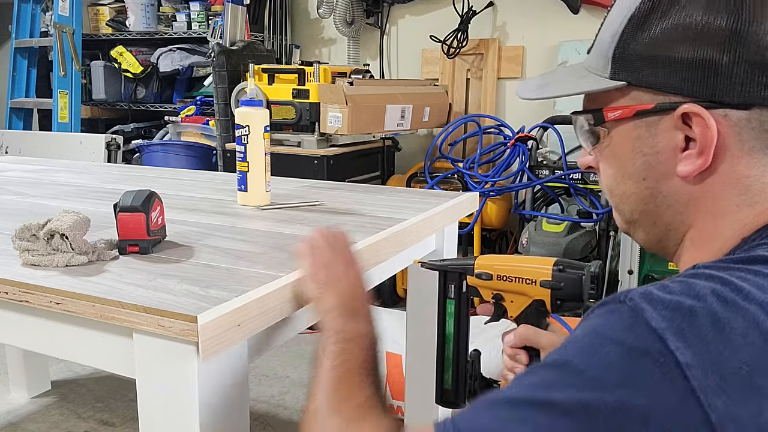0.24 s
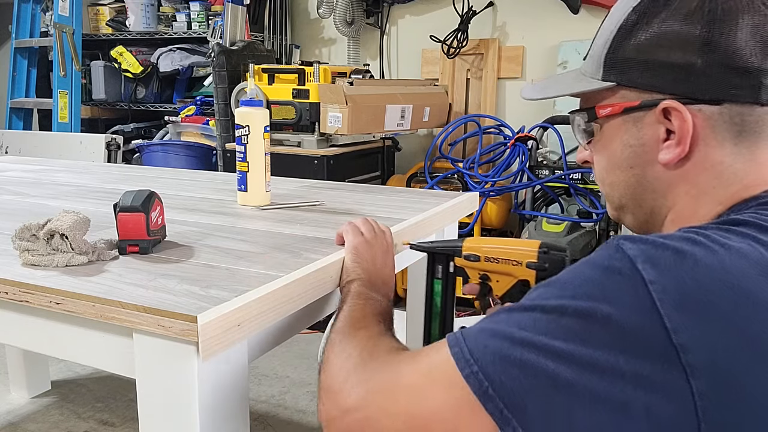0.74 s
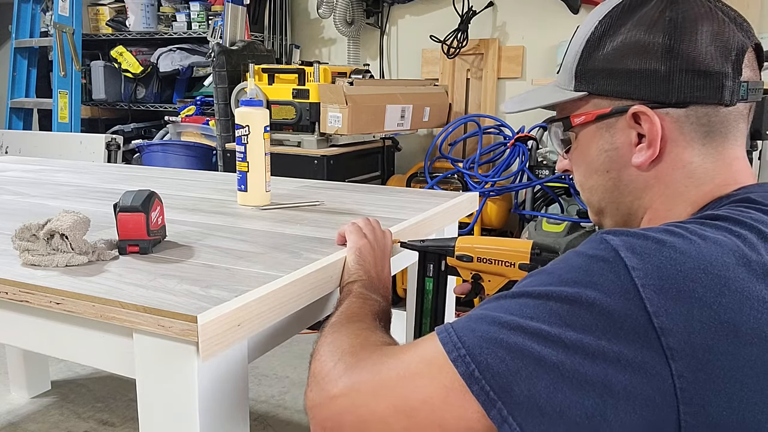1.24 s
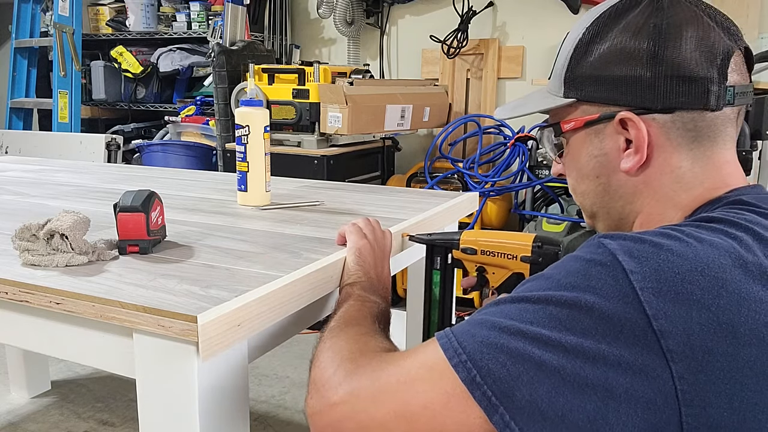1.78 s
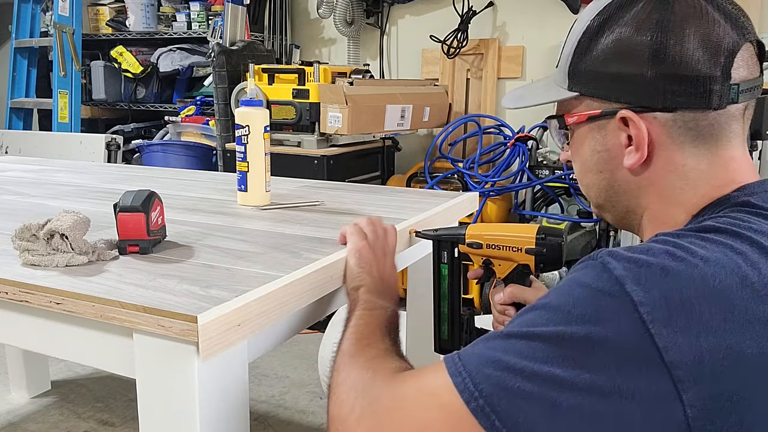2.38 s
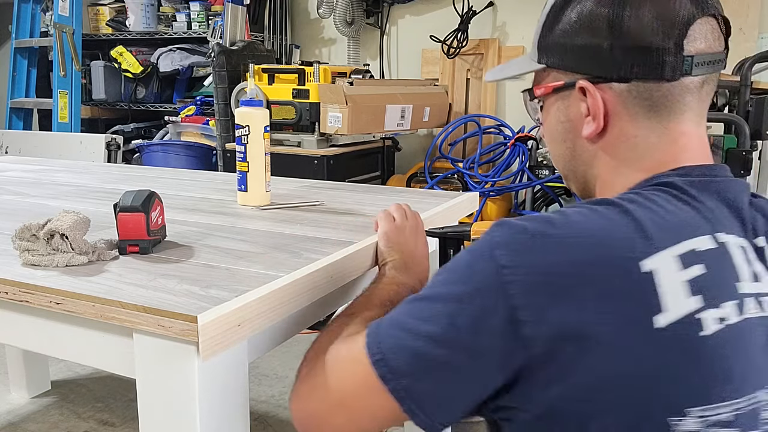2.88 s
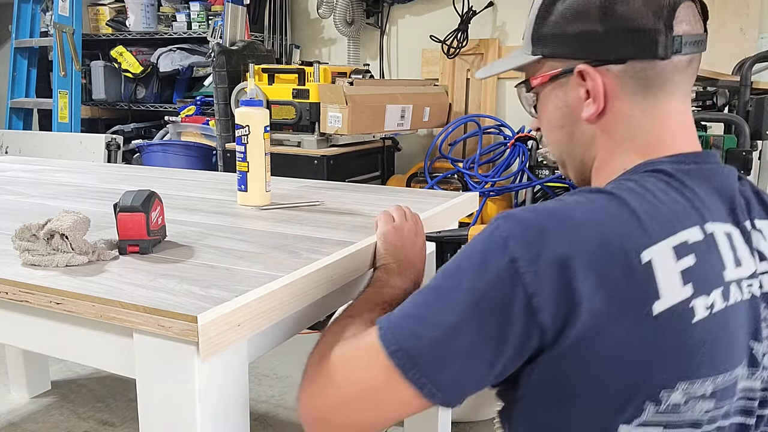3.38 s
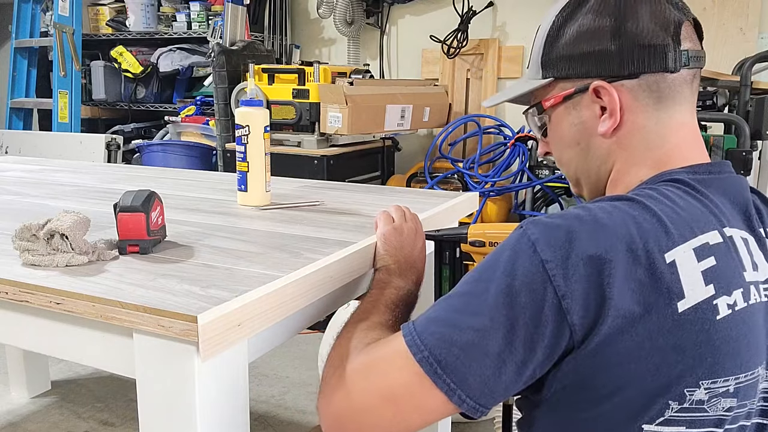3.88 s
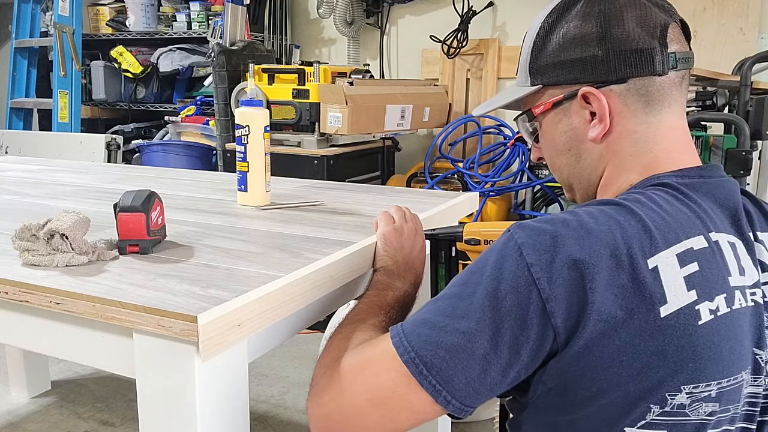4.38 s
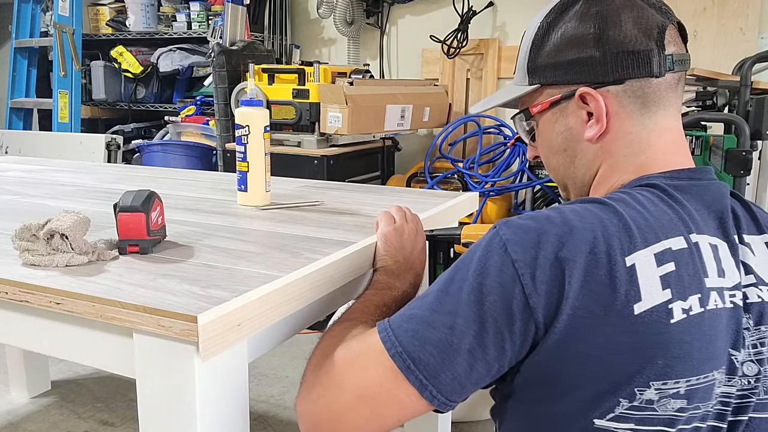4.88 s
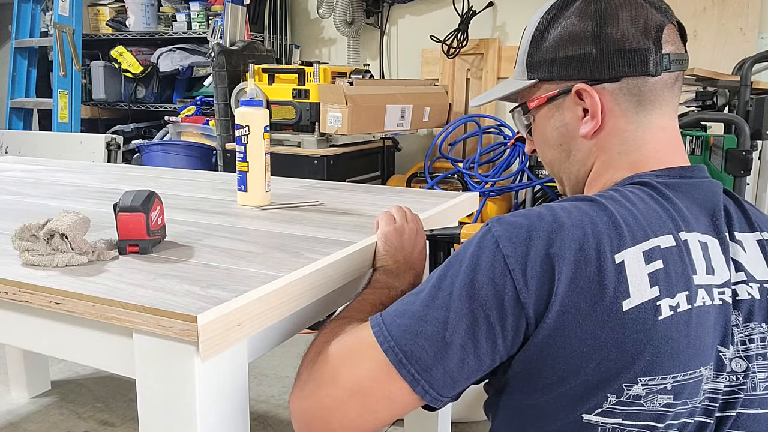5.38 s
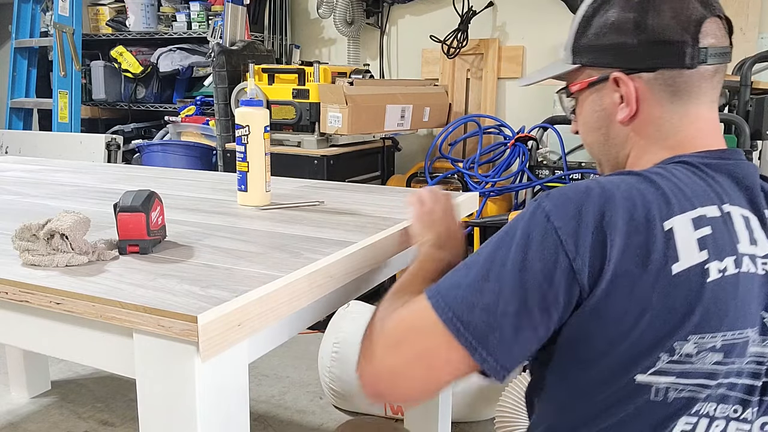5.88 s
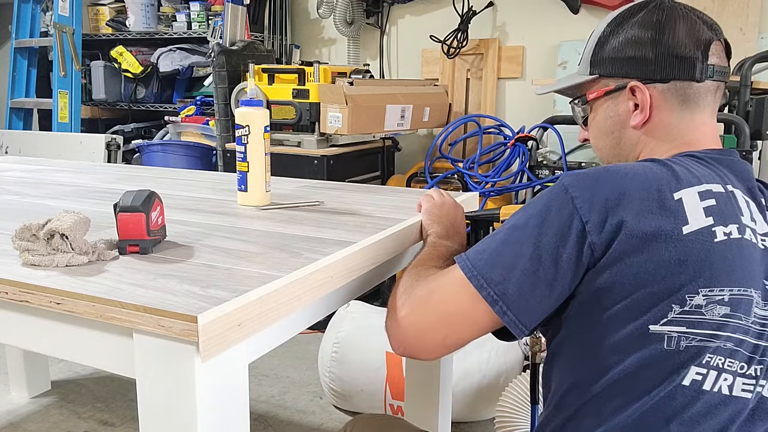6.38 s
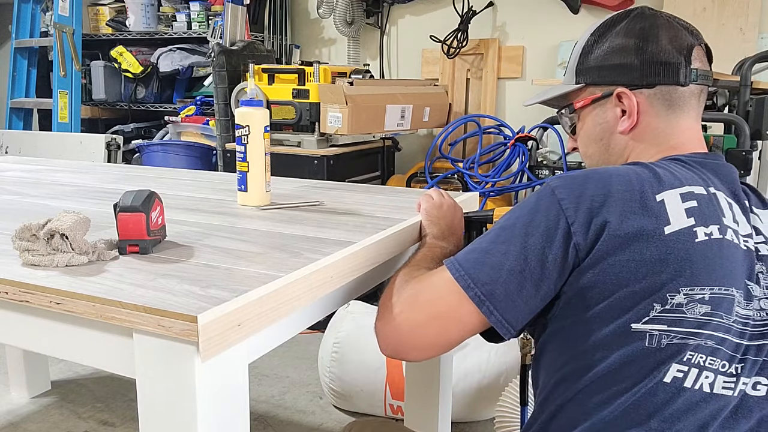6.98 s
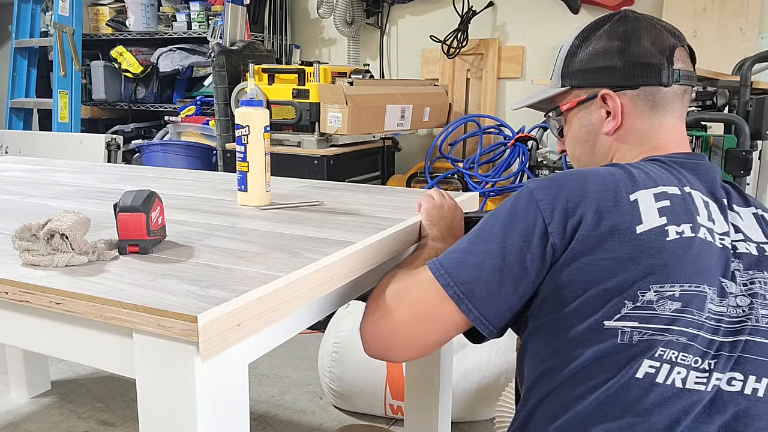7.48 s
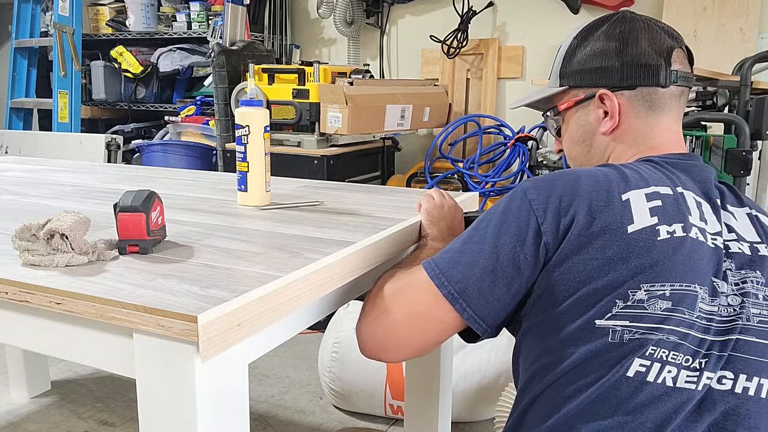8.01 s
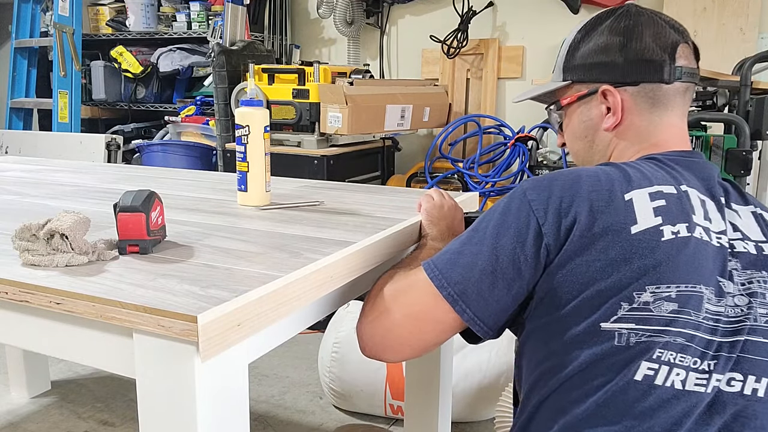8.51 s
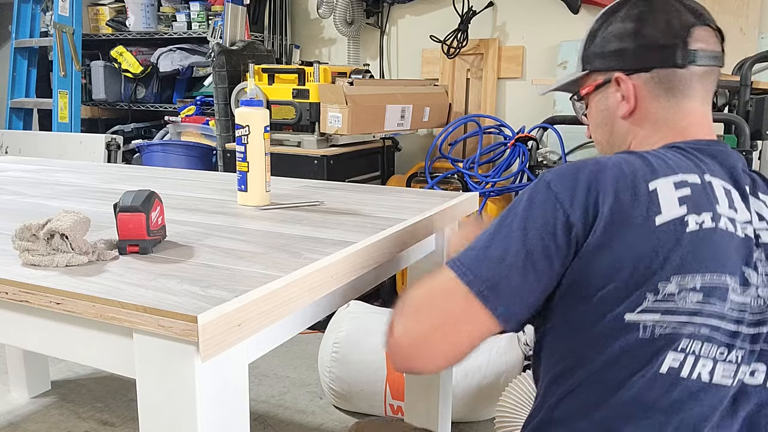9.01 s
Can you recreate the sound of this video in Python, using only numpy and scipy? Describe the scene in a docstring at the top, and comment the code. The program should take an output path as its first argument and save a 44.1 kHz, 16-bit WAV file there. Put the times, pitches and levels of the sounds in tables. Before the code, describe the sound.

A low, slightly throbbing motor hum with faint hiss runs throughout in a small workshop, rising gently over the first two seconds. From about 1 to 4 seconds a pneumatic stapler touches wooden trim with scattered light, high metal clicks. Cloth and hose slide softly at 2 seconds, and a dull bump comes at 2.7. At 5.4 seconds the stapler fires: a loud, sharp crack with a woody knock from the table, followed instantly by a tiny ping, a short gust of exhaust air and a quick metal rattle, with brief room reverberation. The hum dips after the shot and creeps back over the next two seconds. Soft bumps and a few clicks between 6.2 and 6.9 seconds mark the tool being repositioned. A second, similar shot comes at 8.6 seconds, the background dips again, and one last bump on the table follows at 9.1.

```python
"""A machine hums in a workshop while a pneumatic stapler is lined up on trim on a wooden table:
light clicks, dull bumps, a slide of cloth and hose. At 5.4 s it fires: a valve puff, the driver's
double blow, then the valve's ping, a gust of exhaust and the piston rattling home. The tool clicks
into a new place, drives a second staple at 8.6 s and bumps the table once more.
The camera's gain ducks at each shot and creeps back after a hold."""
import sys
import numpy as np
from scipy import signal
from scipy.fft import rfft, irfft, next_fast_len
from scipy.io import wavfile
from scipy.ndimage import uniform_filter1d, minimum_filter1d, map_coordinates

SR = 44100
rng = np.random.default_rng(int(sys.argv[2]) if len(sys.argv) > 2 else 0)


def store_wav(level_fs):
    """Save 16-bit WAV to argv[1]."""
    pcm = np.round(np.clip(np.atleast_2d(level_fs), -1, 1) * 32767)
    wavfile.write(sys.argv[1], SR, pcm.T.astype(np.int16))


N = 407925
TIME = np.arange(N) / SR
AGE = TIME[:SR // 2]  # time since the start of one event

# one cue per staple: (first driver blow [s], puff [dB], wood [dB], table ring [dB], trigger release [s],
# valve ping [dB], exhaust [dB], rattle [dB], rattle time stretch [ratio])
SHOTS = [(5.4411, -9.5, 1.4, -31.5, 5.5625, 13, -5, -1.5, .97),
         (8.5893, -14.5, -1.2, -26, 8.7292, 10.5, -3, 3.5, 1.03)]
# the driver hits the staple, then bottoms out:
# (time after first blow [s], crack [dB], wood [dB], punch [dB])
BLOWS = [(0, 5.5, -0.5, -8), (.0111, 2, 0.8, -13)]
# two surges of exhaust: (time after release [s], level [dB], length [s], tail [s])
SURGES = [(.0053, 0.4, .0085, .004), (.022, -.5, .027, .026)]
# piston and trigger reset: (time after release before stretching [s], clack [dB], thump [dB])
RATTLE = [(.008, 2.5, -11), (.0195, 2, -8.5), (.045, 2.5, -2.5), (.1143, -5, -38)]
# nose and safety catch touch the work:
# (time [s], level [dB], body relative to level [dB], pitch [ratio], lead of a graze or 0 for none [s])
TOUCHES = [(0.972, -39, 1.5, .7, 0), (1.1099, -36, -9, 0.95, 0), (1.3503, -19, -8, 0.99, .017),
           (1.392, -29, 1.5, 1.08, 0.0038), (1.4328, -25, -22, 1.01, 0), (2.1311, -21.5, -10, 1.1, 0),
           (2.279, -28, -10, 1.07, 0), (2.4473, -28.5, -10.5, .98, 0.0068), (2.5803, -26.5, -10, 1, 0.0036),
           (2.7828, -24, -9, 1, .008), (3.4284, -33, -3.5, 1.09, 0), (3.473, -25.5, -11, 0.94, 0.0042),
           (4.007, -23, -27.5, .98, .018), (4.1455, -37, -15, 1, .018), (6.627, -19, -10, 0.98, 0.017),
           (6.8473, -17.5, -27, 0.97, 0.0011), (6.8773, -28, -22, .98, 0), (6.8884, -29.5, -20, 0.98, 0),
           (8.1518, -34.5, -3.5, 0.935, 0)]
# soft bumps against the table: (time [s], tick [dB], thump [dB])
BUMPS = [(.202, -55, -31), (2.712, -18.5, -23), (6.225, -48, -30), (6.549, -20.5, -27.5),
         (9.122, -19, -26.5)]
# cloth and hose slide as the tool moves: (start [s], hold [s], level [dB])
SLIDES = [(2.02, 0.2, -43), (2.66, .02, -59)]
# the worker shifts along the table: (time [s])
MOVES_S = [3.2, 5.9]
# the hum's colour at each place: (harmonic [number], first place [dB], second [dB], third [dB])
MOTOR_HARMONICS = [(1, -65, -61, -62), (2, -49, -50.5, -51.5), (4, -53, -48.5, -47), (5, -54.5, -54, -57),
                   (6, -49, -57.5, -49), (8, -50, -45.5, -51)]
# resonances shaken by the pump: (frequency [Hz], width [Hz], level [dB])
HOUSING_MODES = [(74, 3.5, -45.5), (109.8, 3.4, -40), (251, 36, -61.5), (323.4, 32, -60)]

# ringing parts: (frequency [Hz], level [dB], t60 [s])
TABLE_MODES = [(302, -6, 0.4), (348, -4, 0.44), (394, -5, .4)]  # the table top's long, low ring
PUNCH_MODES = [(165, -5.5, .03), (403, 0, .02)]  # its short knock
VALVE_MODES = [(2395, -7, 0.014), (2710, 0.5, 0.0092), (6900, -8, 0.0066), (8400, -11.5, 0.0087)]  # the valve's ping
CATCH_MODES = [(6800, -17, 0.0069), (7790, -3, 0.017), (7920, -0.5, 0.012), (8500, -11, 0.0092),
               (9800, -32, 0.0068)]  # the safety catch's high tink
BODY_MODES = [(2770, -10, 0.0069), (3610, 1, 0.017), (4460, -4, 0.017), (5570, -3, 0.02)]  # the tool's shell

# noise colours: (frequency [Hz], spectral level [dB])
CRACK_EQ = [(60, -11.5), (200, -6.5), (380, 2), (800, 2), (1300, 7), (2600, -10.5), (4500, -9), (6500, -7),
            (8700, 1), (11000, -6.5), (16000, -14.5)]  # a hard steel strike
WOOD_EQ = [(50, -15), (120, -16.5), (200, -15), (310, -4), (700, 0.5), (1400, 1.5), (2500, -5.5),
           (4200, -14.5), (5700, -16.5), (6700, -13.5), (8600, -15), (11500, -13), (16000, -29.5)]  # the wood's dense modes
EXHAUST_EQ = [(60, -18), (200, -15.5), (400, -8), (1500, -5.5), (2250, -2.5), (2660, 1.5), (3100, -7.5),
              (4500, -10), (5700, -12.5), (6600, -5), (8700, 2.5), (10000, -3.5), (12000, 0),
              (16000, -15.5)]  # air jetting from the cap
THUMP_EQ = [(25, -12.5), (60, 1.5), (190, -9.5), (400, -3.5), (900, -7.5), (2000, -18), (5000, -37.5),
            (16000, -59.5)]  # a thud on the table
RASP_EQ = [(300, -24), (1500, 2), (2400, 5.5), (3000, -1), (3700, 1), (6500, -7), (8500, -5), (11000, -8),
           (15000, -25)]  # cloth rubbing firmly
MACHINE_AIR_EQ = [(20, -34), (40, -14), (65, 2.5), (120, 0.5), (195, -6), (300, .5), (450, -4), (900, -5.5),
                  (1600, -13), (2500, -20.5), (4000, -29.5), (8000, -36.5), (12000, -29), (16000, -32.5)]  # the machine's airy rumble
PUFF_EQ = [(5500, -33), (8300, -3), (12000, -3), (16000, -10.5)]
CLACK_EQ = [(500, -16), (2600, 2), (5000, -11.5), (8400, .5), (11000, -6), (16000, -19.5)]
BODY_EQ = [(1000, 5), (5000, 4), (9000, -5), (15000, -13)]
BUMP_TICK_EQ = [(500, -1), (4000, -2), (8000, -9.5), (13000, 4.5), (16000, -4)]
BRUSH_EQ = [(2000, -9), (6000, -5.5), (9000, -1), (11800, 1), (15000, -14)]
HISS_EQ = [(2000, -9), (5000, -2.5), (6900, -10.5), (7900, -1.5), (9500, -3), (11500, 1.5), (16000, -1)]
WHISTLE_EQ = [(11550, -60), (12020, 0), (12500, -60)]

# the workshop's reverb: (frequency [Hz], t60 [s])
ROOM_DECAY = [(60, 0.16), (300, 0.34), (1200, 0.41), (2700, 0.47), (8000, 0.38), (15000, 0.33)]
# the microphone's comb of notches: (frequency [Hz], depth [0-1])
NOTCH_DEPTH = [(600, 0), (950, .6), (1100, 1), (2000, .8), (3000, .9), (7200, 0.8), (8000, 0.8),
               (10200, .65), (11500, 0.2), (13000, 0.04)]
# more feedback makes them narrower: (frequency [Hz], feedback [0-1])
NOTCH_FEEDBACK = [(1000, .83), (3000, .3), (7000, .3), (10000, .55)]

MOTOR_HZ, PUMP_HZ = 59.72, 8.37


def driver(puff_lead_s=.0058):
    """Air puffs into the cylinder; the driver cracks on the staple and sets the table top ringing."""
    hits, table = np.zeros((2, N))
    for strike, puff_db, shot_wood_db, table_db, *_ in SHOTS:
        add(hits, strike - puff_lead_s, amp(puff_db) * fade(t60=.024, attack=.0013) * noise(PUFF_EQ))
        for delay, crack_db, wood_db, punch_db in BLOWS:
            at = strike + delay
            add(table, at, amp(punch_db) * ring(PUNCH_MODES, scatter_db=1.5))
            add(hits, at, amp(crack_db) * fade(t60=.014, attack=.0008) * noise(CRACK_EQ))
            wood = fade(t60=.25, attack=.012) * noise(WOOD_EQ)
            add(hits, at, amp(shot_wood_db + wood_db - 11.5) * wood)
            add(table, at, amp(table_db) * ring(TABLE_MODES, scatter_db=3))
    return table + room(hits, wet_db=-4, build_s=.018)


def exhaust():
    """The valve snaps back with a ping, then the cylinder vents through the cap in two surges."""
    valve, air = np.zeros((2, N))
    for *_, release, ping_db, air_db, _, _ in SHOTS:
        ping = ring(VALVE_MODES, scatter_db=4.5)
        snap = .35 * fade(t60=.0065, attack=.0002) * noise(CRACK_EQ)
        add(valve, release, amp(ping_db) * (ping + snap))
        for delay, surge_db, length, tail in SURGES:
            flow = (1 - np.exp(-AGE / .003)) * np.exp(-np.maximum(AGE - length, 0) / tail)
            shove = amp(-22) * push(period_s=.0162) + amp(-20) * push(period_s=.0075)
            add(air, release + delay, amp(air_db + surge_db) * (flow * noise(EXHAUST_EQ) + shove))
    sputter = amp(1.9 * wobble(200))  # the piston moves past the ports
    return room(valve, wet_db=-17, build_s=.01) + room(air * sputter, wet_db=-5.5, build_s=.021)


def piston():
    """Steel clacks inside the tool, and its recoil thumps the table."""
    out = np.zeros(N)
    for *_, release, _, _, rattle_db, stretch in SHOTS:
        for delay, clack_db, thump_db in RATTLE:
            at = release + stretch * delay
            add(out, at, amp(rattle_db + clack_db) * fade(t60=.022, attack=.0012) * noise(CLACK_EQ))
            add(out, at, amp(thump_db) * fade(t60=.04, attack=.00149) * noise(THUMP_EQ))
    return room(out, wet_db=-11.5, build_s=.01)


def handling():
    """Light metal clicks and dull bumps while the tool is lined up."""
    out = np.zeros(N)
    for at, db, body_db, pitch, lead in TOUCHES:
        add(out, at, amp(db) * click(body_db, pitch))
        if lead > 0:  # a weaker, duller graze comes first
            add(out, at - lead, amp(db - 12.5) * click(body_db + 3, pitch))
    for at, tick_db, thump_db in BUMPS:
        add(out, at, amp(tick_db) * fade(t60=.0041, attack=.0002) * noise(BUMP_TICK_EQ))
        thud = fade(t60=.051, attack=.00099) * noise(THUMP_EQ)
        add(out, at, amp(thump_db) * (thud + .59 * push(period_s=.016)))
    return room(out, wet_db=-18, build_s=.01)


def click(body_db, pitch):
    """One metal contact: a tick, the catch's high ring and the tool's lower body ring, mixed per touch."""
    contact = fade(t60=.015, attack=.0004)
    tick_eq = [(3000, -22), (5800 * pitch, -15), (8200 * pitch, 0), (11000 * pitch, -12), (18000, -28)]
    tick = .58 * contact * noise(tick_eq)
    catch = .73 * ring(CATCH_MODES, scatter_db=1.5, pitch=pitch, size=2048, phase_spread=0)
    body = .5 * ring(BODY_MODES, scatter_db=3, size=2048) + 1.2 * contact * noise(BODY_EQ)
    return catch + tick + amp(body_db) * body


def rustle(rise_s=.13, fall_s=.12, firm_s=.25):
    """Sliding cloth and hose: each slide starts as a bright brush and rasps lower as it firms up."""
    out = np.zeros(N)
    t = TIME[:SR]
    firmness = np.clip(t / firm_s, 0, 1)
    for start, hold, db in SLIDES:
        swell = np.minimum(t / rise_s, 1) * np.exp(-np.maximum(t - rise_s - hold, 0) / fall_s)
        brush = np.sqrt(1 - firmness) * noise(BRUSH_EQ, size=SR)
        rasp = amp(1.5) * np.sqrt(firmness) * noise(RASP_EQ, size=SR)
        add(out, start, amp(db) * swell * (brush + rasp))
    flutter = amp(1.4 * wobble(34.92))
    return out * flutter


def machine():
    """A running motor and pump: their tones beat, and the air noise throbs at the stroke rate."""
    shaft_time = TIME + .00017 * wobble(2)  # the speed drifts a little
    hum = motor(shaft_time)
    throb_db = .27 * np.sin(2 * np.pi * PUMP_HZ * TIME) + .31 * wobble(6.6)
    return hum + pump(shaft_time) + amp(-39.5 + throb_db) * noise(MACHINE_AIR_EQ, size=N)


def motor(shaft_time, move_s=.8):
    """Harmonics of the motor's speed; their balance crossfades as the worker shifts place."""
    place = sum(np.clip((TIME - at) / move_s + .5, 0, 1) for at in MOVES_S)
    hum = np.zeros(N)
    for harmonic, *place_db in MOTOR_HARMONICS:
        level = np.interp(place, np.arange(len(place_db)), amp(place_db))
        cycles = harmonic * MOTOR_HZ * shaft_time + rng.random()
        hum += level * np.sqrt(2) * np.sin(2 * np.pi * cycles)
    return hum


def pump(shaft_time, first_stroke_s=.05, smear_above_hz=199.6, low_cut_hz=55):
    """Each stroke shakes the housing: a low throb, which the room smears into a drone higher up."""
    hz = PUMP_HZ * np.arange(64)
    shake = sum(amp(db) * 1j * hz * width / (mode ** 2 - hz ** 2 + 1j * hz * width)
                for mode, width, db in HOUSING_MODES)
    smear = np.exp(2j * np.pi * rng.random(len(hz)) * (hz > smear_above_hz))
    low_cut = hz ** 4 / (hz ** 4 + low_cut_hz ** 4)  # the housing is too small to give off deep bass
    stroke = irfft(shake * low_cut * smear, 2048, norm="forward") / np.sqrt(2)
    stroke_phase = (shaft_time - first_stroke_s) * PUMP_HZ % 1
    return np.interp(stroke_phase, np.arange(len(stroke)) / len(stroke), stroke)


def hiss():
    """Faint electronic hiss with a thin whistle in it."""
    whistle = amp(-65.5) * noise(WHISTLE_EQ, size=N)
    return amp(-53) * noise(HISS_EQ, size=N) + whistle


def room(dry, wet_db, build_s):
    """The dry sound plus the workshop's reverb, which swells in and lingers longest in the mids."""
    hz, t, grains = signal.stft(rng.standard_normal(SR * 3 // 4), SR, nperseg=256)
    decay = np.exp(-np.log(1000) * t / along(ROOM_DECAY, hz)[:, None])
    swell = 1 - np.exp(-(t / build_s) ** 2)
    tail = signal.istft(grains * decay * swell, SR, nperseg=256)[1]
    return dry + amp(wet_db) * signal.fftconvolve(dry, tail / np.linalg.norm(tail))[:N]


def microphone_comb(hz, spacing_hz=1018):
    """A short echo at the microphone cuts a comb of narrow notches."""
    echo = np.exp(-2j * np.pi * hz / spacing_hz)
    feedback = along(NOTCH_FEEDBACK, hz)
    return 1 - along(NOTCH_DEPTH, hz) * (1 - feedback) * echo / (1 - feedback * echo)


def gain_control(x, cut_db, attack_s, hold_s, release_s, last_loud_s):
    """A loud peak eases the gain down; after a hold it creeps back. It starts out ducked."""
    loud = np.abs(x) > .5
    quiet_for = TIME - np.maximum.accumulate(np.where(loud, TIME, last_loud_s))
    duck = np.clip(1 - (quiet_for - hold_s) / release_s, 0, 1) ** 1.87
    step = 1 / (attack_s * SR)
    smooth_duck = signal.lfilter([step], [1, step - 1], duck, zi=duck[:1])[0]
    return x * amp(-cut_db * smooth_duck)


def limiter(x, size):
    """Look-ahead limiter: the gain dips around each peak over full scale."""
    needed = 1 / np.maximum(np.abs(x), 1)
    return x * uniform_filter1d(minimum_filter1d(needed, size), size)


def ring(modes, scatter_db, pitch=1, size=len(AGE), phase_spread=1):
    """Damped modes, struck at new strengths each time; with no phase spread they start in step."""
    hz, db, t60 = np.transpose(modes)[:, :, None]
    t = AGE[:size]
    strength = amp(db + scatter_db * rng.standard_normal(hz.shape))
    cycles = pitch * hz * t + phase_spread * rng.random(hz.shape)
    partials = strength * np.exp(-np.log(1000) * t / t60) * np.sin(2 * np.pi * cycles)
    attack = 1 - np.exp(-t / .0003)
    return np.pad(partials.sum(0) * attack, (0, len(AGE) - size))


def push(period_s):
    """A low shove of air pressure, out and back."""
    window = np.sin(np.pi * np.minimum(AGE / (2 * period_s), 1)) ** 2
    return window * np.sin(2 * np.pi * AGE / period_s)


def fade(t60, attack):
    """Percussive envelope, times in seconds."""
    return np.exp(-np.log(1000) * AGE / t60) * (1 - np.exp(-AGE / attack))


def noise(eq, size=len(AGE)):
    """Coloured noise of rms 1."""
    m = next_fast_len(size)
    gain = amp(along(eq, np.fft.rfftfreq(m, 1 / SR)))
    coloured = irfft(rfft(rng.standard_normal(m)) * gain, m)[:size]
    return coloured / np.sqrt(np.mean(coloured ** 2) + 1e-20)


def wobble(rate):
    """A smooth random curve, rate knots a second."""
    knots = rng.standard_normal(int(N * rate / SR) + 4)
    return np.interp(TIME, TIME[::64], map_coordinates(knots, [TIME[::64] * rate]))


def filtered(x, response):
    """Pass x through a frequency response."""
    m = next_fast_len(len(x) + 8192)
    return irfft(rfft(x, m) * response(np.fft.rfftfreq(m, 1 / SR)), m)[:len(x)]


def along(points, hz):
    """Read a curve of (frequency [Hz], value) points on a log axis."""
    point_hz, values = np.transpose(points)
    return np.interp(np.log(hz + 1), np.log(point_hz + 1), values)


def amp(db):
    """Decibels to gain."""
    return 10 ** (np.asarray(db) / 20)


def add(track, start_s, sound):
    """Mix a sound into the track."""
    part = track[round(start_s * SR):][:len(sound)]
    part += sound[:len(part)]


def scene():
    """The mono mix: shots and handling over the workshop's bed of hum and hiss."""
    return (driver() + exhaust() + piston() + handling() + rustle() + machine() + hiss())[None]


def record(dry):
    """The camera's chain: microphone comb, gain control, limiter and high cut."""
    combed = filtered(dry[0], microphone_comb)
    ducked = gain_control(combed, cut_db=10, attack_s=.12, hold_s=.94, release_s=1.41, last_loud_s=-.33)
    limited = limiter(ducked, size=256)
    return filtered(limited, lambda hz: hz < 15800)[None]


dry = scene()
out = record(dry)
store_wav(out)
```